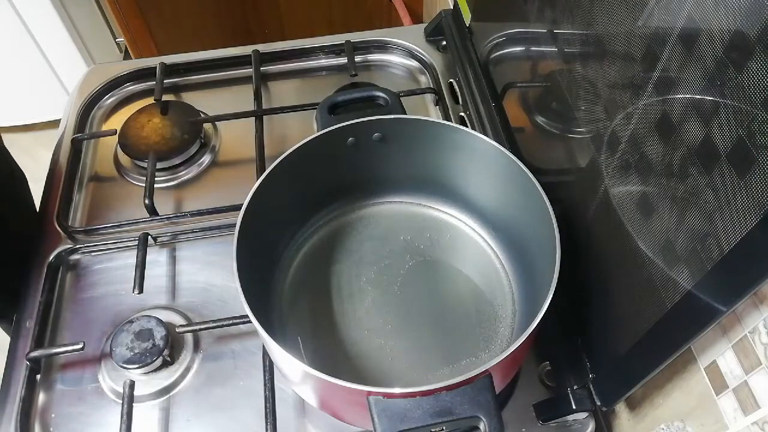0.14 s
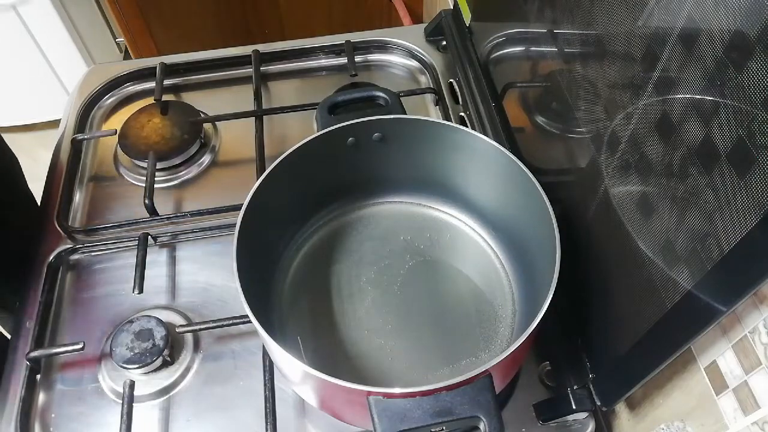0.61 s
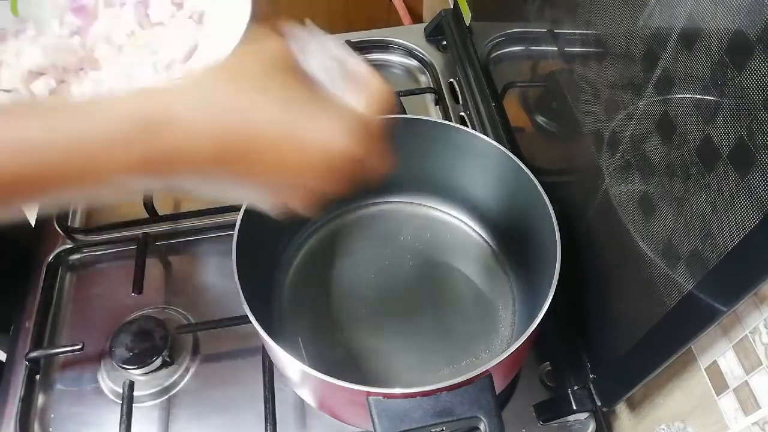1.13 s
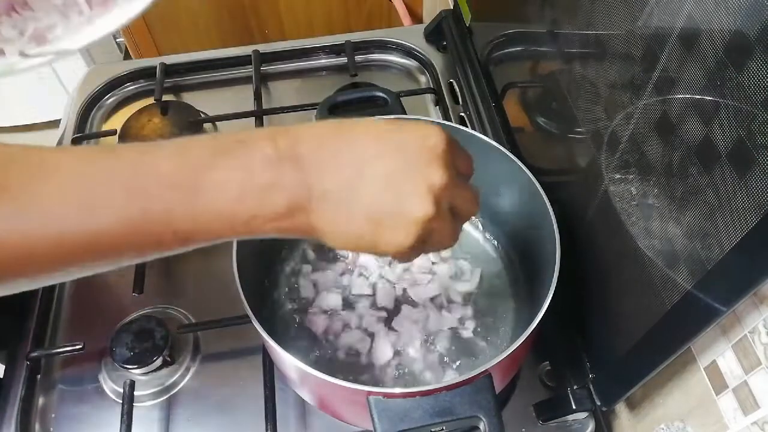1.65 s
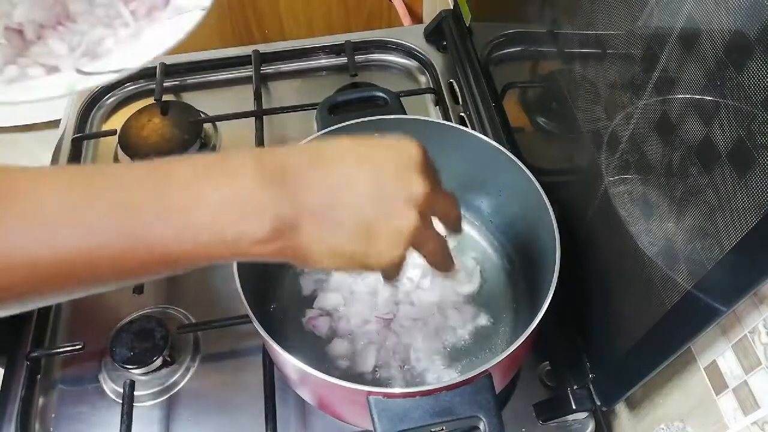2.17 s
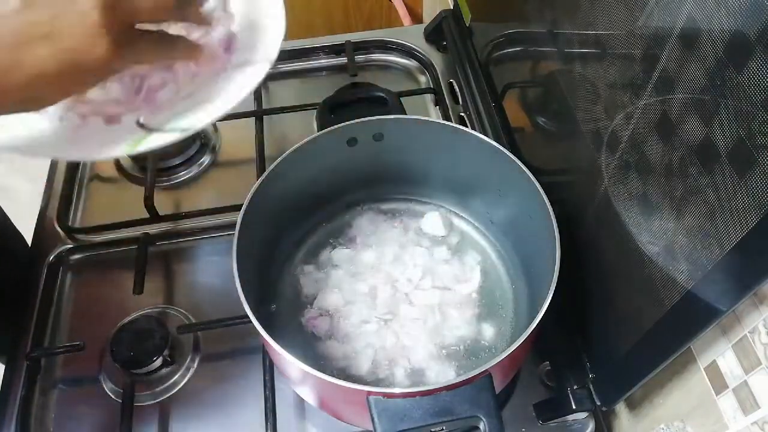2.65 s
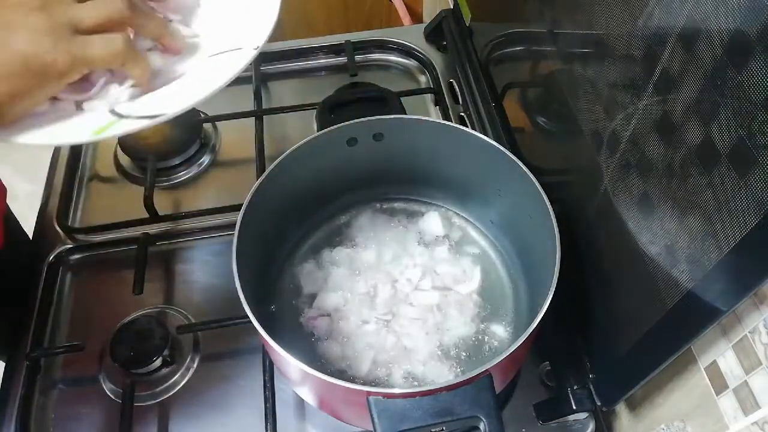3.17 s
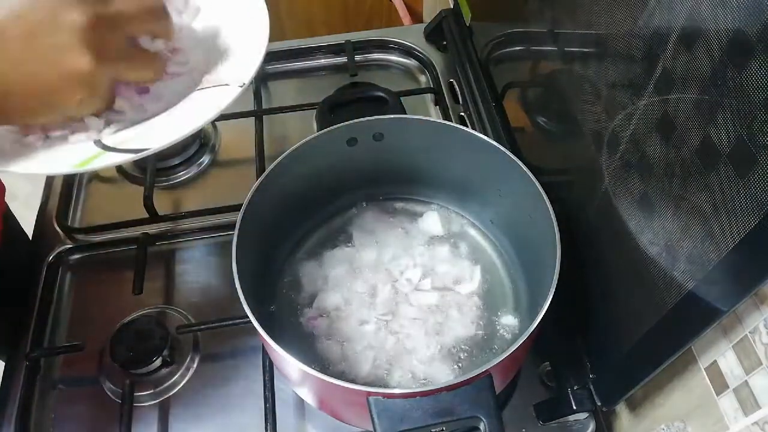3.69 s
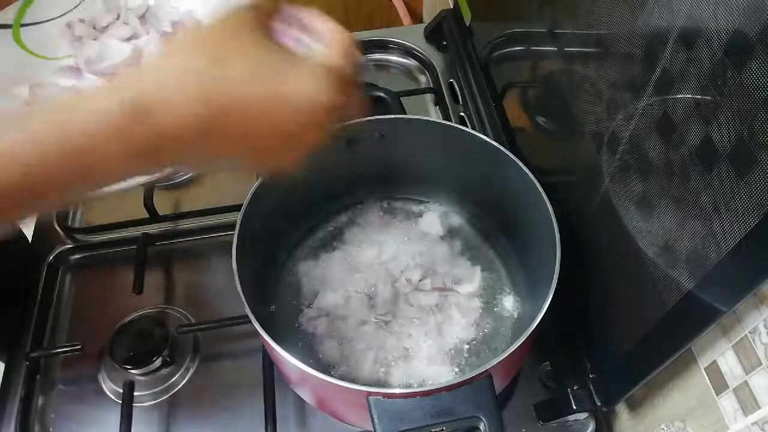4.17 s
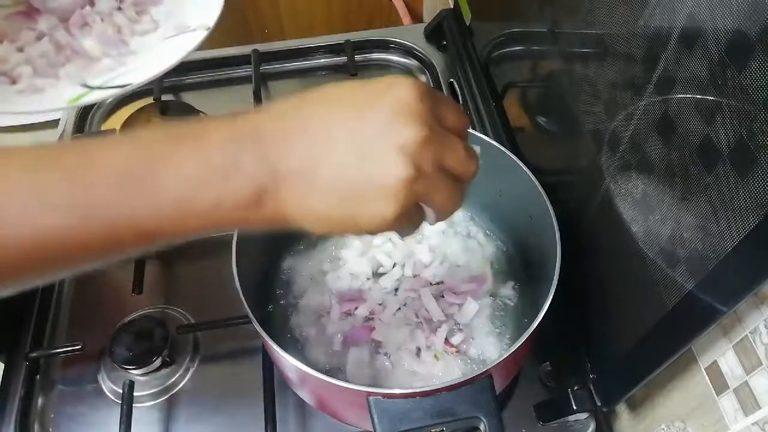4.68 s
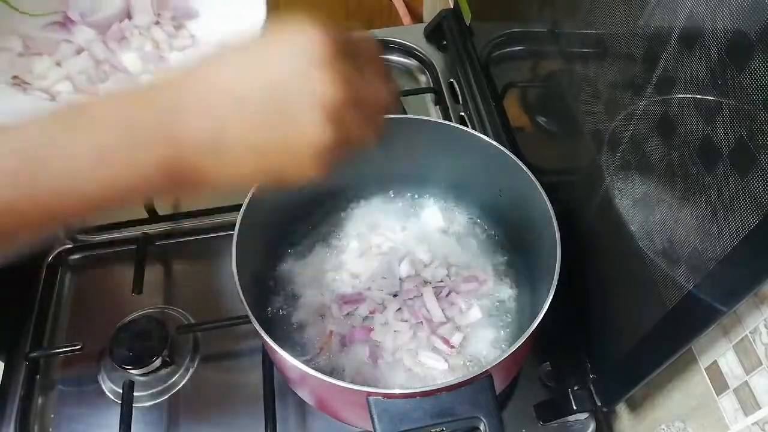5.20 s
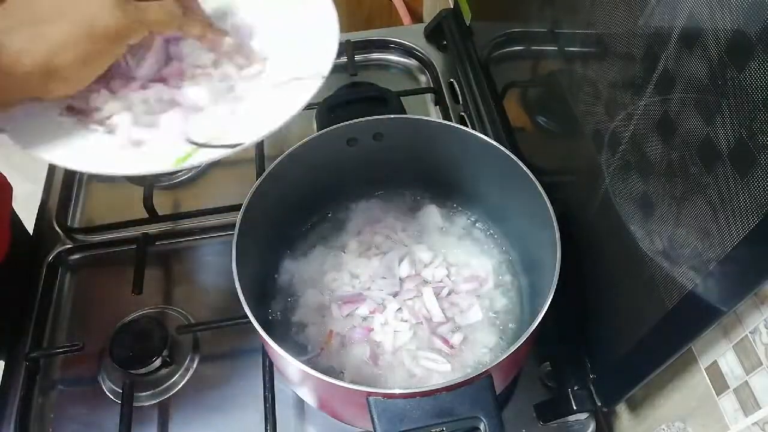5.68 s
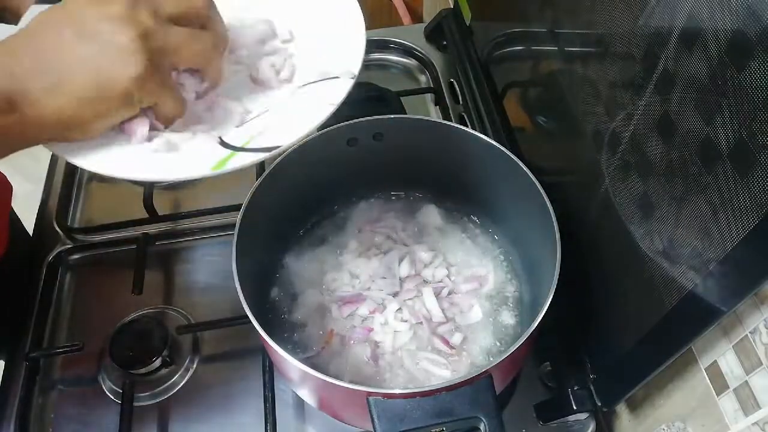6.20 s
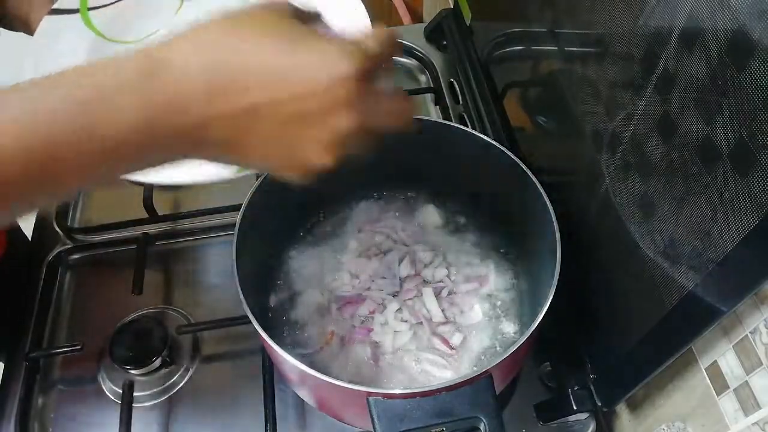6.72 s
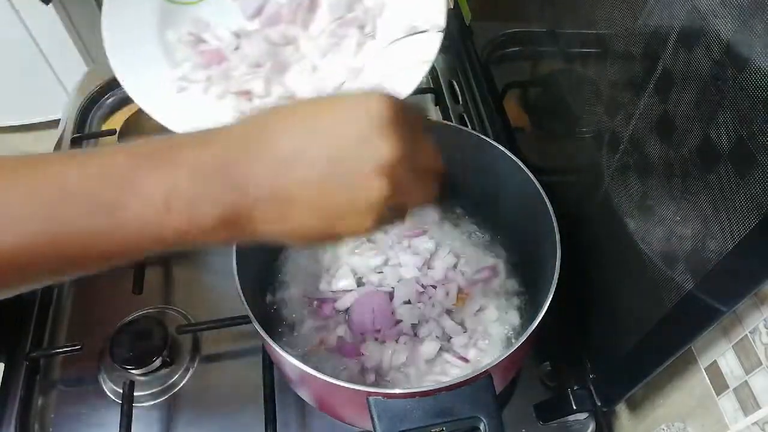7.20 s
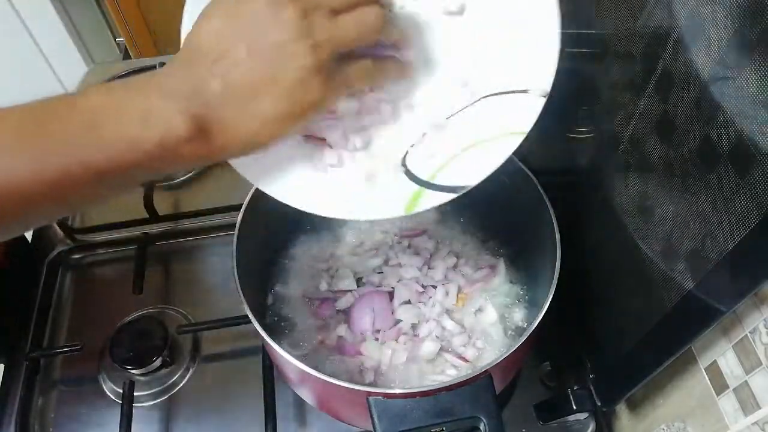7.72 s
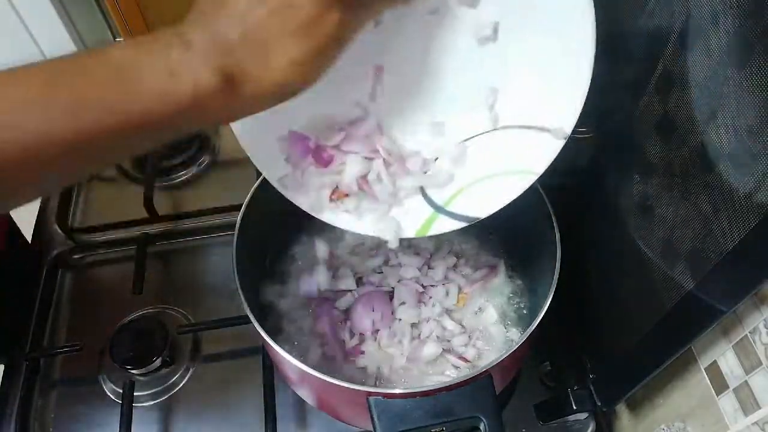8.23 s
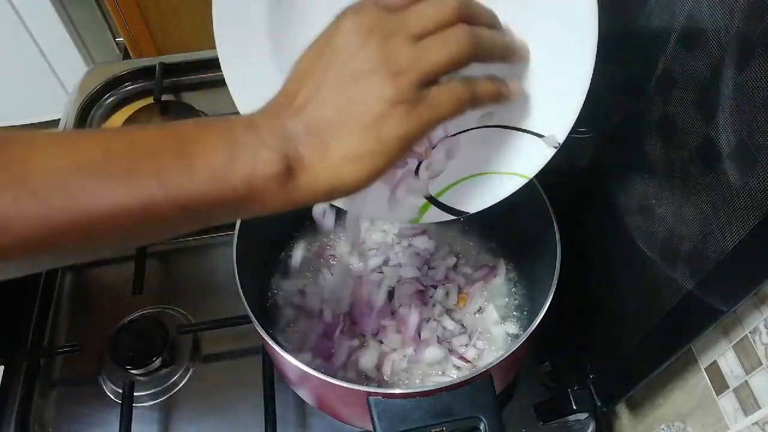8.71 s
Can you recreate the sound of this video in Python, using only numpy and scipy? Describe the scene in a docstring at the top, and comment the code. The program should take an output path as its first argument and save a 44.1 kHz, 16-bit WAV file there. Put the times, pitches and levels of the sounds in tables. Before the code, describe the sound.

A small kitchen, heard close to a deep metal pot in stereo. For the first 1.3 seconds it is nearly quiet: faint mains hum, low uneven rumble, room air, and a dry crinkling with tiny ticks, mainly around 0.2 to 0.4. At about 1.4 a handful of chopped onion thuds onto the bare base and the oil erupts in loud, bright sizzling, with sharp spits strongest near 1.9. By 2.1 it has fallen to a steady, gently fading fry with a hollow metallic resonance, crackles and bubbly pops. A second handful lands softly at 4.45, slightly lifting the sizzle. Pops cluster around 5.4 to 6.1, followed by a brief rising steam whistle at 6.1. Another muffled landing comes at 6.9, then very faint ones at 7.9 to 8.7, as the fry thins and softens until the end at about 8.9.

```python
"""A kitchen: handfuls of chopped onion drop into hot oil in a deep metal pot, close to a two-port microphone.
Thousands of short damped sines and patchy noise make the sizzle; larger bubbles seethe, pop and spit.
The pot rings along as a bank of resonances, the landings thud and splash, and a jet of steam whistles.
Behind lie mains hum, low rumble and room air; a faint dry rustle comes before the first handful."""
import sys
import numpy as np
from scipy import signal
from scipy.fft import rfft, irfft, next_fast_len
from scipy.io import wavfile
from scipy.ndimage import uniform_filter1d, map_coordinates

SR = 44100
rng = np.random.default_rng(int(sys.argv[2]) if len(sys.argv) > 2 else 0)


def persist_wave(psi):
    """Save psi, clipped to +-1, as 16-bit WAV."""
    counts = np.round(np.clip(psi, -1, 1) * 32767).astype(np.int16)
    wavfile.write(sys.argv[1], SR, np.atleast_2d(counts).T)


def invert_db(x):
    """Field ratio 10**(x/20) for x, a level in decibels (scalar or array-like)."""
    u = np.asarray(x, float) / 20
    return 10 ** u


N = 390726

# Sizzle of the frying, before its surges: (time [s], level [dB])
SIZZLE_LEVEL = [(1.35, -45), (1.36, -21.5), (1.375, -26), (1.39, -26.5), (1.45, -22.5), (1.66, -22),
                (1.72, -24.5), (1.96, -27.5), (2.07, -31.5), (2.5, -32), (3.2, -33.5), (3.75, -34.5),
                (4.25, -36), (4.53, -33.5), (5.6, -36), (6.95, -36.5), (8, -38.5), (8.86, -40)]
# Colour of the small bubbles: (frequency [Hz], relative density [dB per Hz])
SIZZLE_COLOUR = [(1500, -82), (3200, -15.5), (4200, -18), (4800, -9), (6300, -5), (7900, -3.5), (10700, -5),
                 (12500, -11.5), (15100, -24), (15900, -17.5)]
# Colour of the larger bubbles: (frequency [Hz], relative density [dB per Hz])
SEETHE_COLOUR = [(120, -15), (300, -7), (500, -0.5), (770, -5), (1500, -1.5), (2500, 3), (4000, 4.5),
                 (5500, 2.5), (7000, -8.5)]
# Stereo lean of the frying: (frequency [Hz], left over right [dB])
FRY_LEAN = [(400, -1.5), (900, -1.5), (1800, 1), (3000, 1.5), (6400, 3), (9800, -0.7), (15000, -2.8)]
# Resonances of the pot's air and walls: (centre [Hz], width [Hz], gain [dB])
POT_MODES = [(922, 25, -11), (1060, 28, -4), (1150, 76, -0.5), (1240, 77, -6), (1400, 72, -6),
             (1678, 37, -3), (1950, 57, -10), (2270, 73, -10.5), (2720, 68, -8)]
# Sharpest spits, note peak before filtering and reflections:
# (time [s], level [dB], pitch [Hz], left over right [dB])
SHARP_SPITS = [(1.3834, -10, 8900, 1.0), (1.5933, -9, 10200, 0.5), (1.761, -8.5, 7900, -5),
               (1.8418, -11, 7900, -4), (1.909, -2, 9660, -2), (1.9558, -7, 9100, -4),
               (2.0553, -15, 9400, -9), (2.0982, -13.5, 10900, -6), (2.2917, -9.5, 11000, -7),
               (2.5222, -16, 6900, -3), (2.7575, -21.5, 3900, 6), (3.1264, -15, 6670, -6),
               (3.4581, -13, 8400, 2), (3.6246, -14, 8200, 1.5), (3.6752, -9.5, 8640, 2.0),
               (5.478, -15.5, 9200, 4), (5.5938, -15, 7800, 2), (5.685, -14, 8050, 3),
               (5.923, -15, 7900, 9), (6.0597, -19, 4700, -2), (6.4365, -21, 4600, 2),
               (6.6758, -14, 7760, 10), (7.022, -20, 10700, 1.0), (7.167, -17, 8500, 4),
               (8.0262, -23, 5710, 2), (8.109, -16, 10700, 0.5), (8.2103, -14, 10700, -3),
               (8.411, -16, 10400, -8), (8.6024, -20, 7980, 9), (8.794, -14.5, 10300, -1.0)]
# Biggest bubbles bursting, note peak before filtering and reflections:
# (time [s], level [dB], pitch [Hz], left over right [dB])
BIG_POPS = [(1.389, -24.5, 1330, -3), (1.393, -27, 1950, -10), (1.658, -28, 1240, -2),
            (1.739, -21.5, 2680, 11), (1.81, -33, 1080, -2), (2.198, -31, 1080, -4),
            (2.246, -31.5, 1060, -2.5), (3.4201, -23, 2630, 1.0), (3.46, -30, 1180, -2),
            (3.554, -30, 2910, -1.0), (3.675, -32, 1330, 1), (3.878, -27, 2800, 0.5),
            (3.9399, -29.5, 3080, 0), (4.132, -22, 2160, -8), (4.141, -26, 2270, 2), (5.1128, -28, 2770, 4),
            (5.412, -27, 1760, -1.0), (5.458, -23, 1850, 4), (5.48, -20.5, 1340, -2),
            (5.994, -19.5, 1095, -3), (6.004, -21, 1950, 3), (6.059, -27, 1140, 2), (6.147, -28, 1180, 2),
            (6.436, -23.5, 2460, 2), (6.653, -34, 1400, -0.5), (6.831, -30.5, 1380, -4),
            (6.832, -31.5, 1870, 0.5), (6.96, -33, 910, -5), (6.972, -28.5, 1090, -0.5),
            (7.913, -35, 690, -1), (8.013, -37, 1400, -2), (8.112, -32.5, 1430, -3),
            (8.504, -39.5, 1060, -9), (8.607, -40, 1080, -1), (8.694, -35.5, 1080, -4)]
# Onion landing on the base, thud peak before panning: (time [s], level [dB], tumble decay [s])
ONION_LANDINGS = [(1.392, -22.5, 0.024), (1.472, -30.5, .046), (4.448, -33, 0.043), (4.493, -45, 0.026),
                  (6.923, -39, 0.034), (6.96, -35.5, 0.031), (7.912, -48, 0.016), (8.109, -43.5, 0.021),
                  (8.501, -47, 0.017), (8.604, -43.5, 0.036), (8.69, -49, 0.062)]
# Modes of the bare base, before a small random scatter in level: (frequency [Hz], level [dB], t60 [s])
BASE_MODES = [(371, 0, 0.2), (385, -14.5, 0.062), (439, -14.5, 0.31), (574, -12.5, 0.19), (910, -3, 0.078),
              (1038, -9, 0.19)]
# Colour of the oil thrown aside: (frequency [Hz], relative density [dB per Hz])
SPLASH_COLOUR = [(150, -49), (300, -4), (600, -0.5), (1200, -15), (2000, -8), (3500, -40)]
# Steam venting under a piece, before its pulsing: (time [s], pitch [Hz], level [dB])
STEAM_GLIDE = [(6.066, 980, -44), (6.087, 1150, -41.5), (6.115, 1320, -34), (6.145, 1410, -38)]
# Dry crinkles before the frying: (peak time [s], level [dB], fade [s])
DRY_CRINKLES = [(.17, -50, .01), (.21, -52, .02), (.25, -51, 0.026), (.3, -51, 0.044), (.39, -59, 0.058),
                (.66, -67, .02), (.93, -68, .015)]
# Colour of the crinkles: (frequency [Hz], relative density [dB per Hz])
CRINKLE_COLOUR = [(530, -46), (900, -9), (1230, -1), (2090, -18), (2720, -7), (4400, -10), (8930, -4.5),
                  (15900, -15)]
# Ticks among the crinkles, note peak before filtering and reflections:
# (time [s], level [dB], pitch [Hz], left over right [dB])
DRY_TICKS = [(.016, -49.5, 4510, 0), (.163, -40, 9000, .5), (.2995, -34, 8930, 1.5), (.9214, -48, 8000, 0),
             (0.931, -45.5, 3420, 2), (0.936, -46.5, 1350, 0), (1.196, -46, 7540, 1.5)]
# Rumble, before its random waver: (time [s], level [dB])
RUMBLE_LEVEL = [(0.0, -40.5), (0.15, -53), (0.32, -44.5), (0.47, -56.5), (2.14, -59), (2.24, -47),
                (2.32, -66), (2.44, -46), (2.49, -53), (2.81, -54), (3.06, -55), (3.18, -50.5),
                (4.39, -52.5), (4.76, -48), (5.18, -59.5), (8.86, -57)]
# Colour of the rumble: (frequency [Hz], relative density [dB per Hz])
RUMBLE_COLOUR = [(15, -49), (25, -19), (59, -6), (75, -4.5), (97, -11), (105, -21), (140, -32), (230, -120)]
# Colour of the room air: (frequency [Hz], relative density [dB per Hz])
AIR_COLOUR = [(59, -54), (100, -9), (129, -9), (166, -5.5), (244, -9), (308, -12.5), (460, -14),
              (546, -23.5), (816, -20.5), (889, -18.5), (1710, -22.5), (5060, -38.5), (10400, -40),
              (15900, -52)]
# Likeness of the room air at the two ports: (frequency [Hz], left-right correlation [-1 to 1])
AIR_LIKENESS = [(60, 0.63), (240, 0.99), (950, -0.52), (3770, 0.15), (15000, -0.16)]

STEADY_DB = -35  # sizzle of the settled fry, the reference for what follows it
SPAN_S = .0006  # full spread of left-right arrival differences across the pot
MIC_HZ = 14400  # corner of the microphone's top
TOP_HZ = 15900  # band limit


def unit(x):
    """Scales to rms 1."""
    return x / np.sqrt(np.mean(x ** 2) + 1e-20)


def along(points, hz):
    """Reads a table against frequency on a log axis."""
    f, v = np.transpose(points)
    return np.interp(np.log(hz + 1), np.log(f + 1), v)


def curves(rows):
    """Draws one value per sample for each column after the time."""
    s, *cols = np.transpose(rows)
    return [np.interp(np.arange(N) / SR, s, c) for c in cols]


def wobble(rate):
    """A smooth random curve with rate knots a second."""
    knots = rng.standard_normal(int(N * rate / SR) + 4)
    return map_coordinates(knots, [np.arange(N) * rate / SR])


def filtered(x, response):
    """Multiplies the spectrum by a complex response of frequency."""
    m = next_fast_len(N + 8192)
    return irfft(rfft(x, m) * response(np.fft.rfftfreq(m, 1 / SR)), m)[..., :N]


def coloured(x, spectrum):
    """Replaces the average spectrum of a sound by the given one, at rms 1."""
    own_hz, own_power = signal.welch(x, SR, nperseg=256)
    own_power = np.atleast_2d(own_power).mean(0)

    def response(hz):
        return invert_db(along(spectrum, hz)) / np.sqrt(np.interp(hz, own_hz, own_power) + 1e-12)
    return unit(filtered(x, response))


def sides(db):
    """Left and right gains for a left-over-right level."""
    return invert_db(np.array([db, -np.asarray(db)]) * .5)


def hiss(patchy_db):
    """Unrelated noise on the two ports, with patches of random gain shared in time and frequency."""
    z = signal.stft(rng.standard_normal((2, N)), nperseg=256)[2]
    field = uniform_filter1d(rng.standard_normal(z.shape[1:]), 8, 0)
    field = unit(uniform_filter1d(field, 8, 1))
    return unit(signal.istft(z * invert_db(patchy_db * field), nperseg=256)[1][:, :N])


def scattered(x, direct_db, t60):
    """Each port hears the direct sound, then quick reflections off walls and hob, redrawn every 0.1 s."""
    hop = SR // 10
    count, t = N // hop + 1, np.arange(hop) / SR
    tail = rng.standard_normal((2, count, hop)) * invert_db(-60 * t / t60)
    tail = tail / np.linalg.norm(tail, axis=2, keepdims=True) / invert_db(direct_db)
    echo = tail + (t == 0)  # the direct sound is a single sample of 1
    blocks = np.pad(x, ((0, 0), (0, count * hop - N))).reshape(2, count, hop)
    wet = irfft(rfft(blocks, 2 * hop) * rfft(echo, 2 * hop), 2 * hop)
    early = wet[..., :hop].reshape(2, -1)
    late = np.pad(wet[..., hop:].reshape(2, -1), ((0, 0), (hop, 0)))
    return early[:, :N] + late[:, :N]


def pot(hz):
    """The pot's air and walls as a sum of band-pass resonances."""
    return sum(invert_db(db) * 1j * hz * w / (c * c - hz * hz + 1j * hz * w) for c, w, db in POT_MODES)


def bubbles(s, size, hz, cycles, rise, lag, width):
    """Damped sines whose pitch rises as each bubble opens.

    size: (ports, bubbles) peaks; lag: left port behind right [s]; width: length [samples]."""
    k = np.arange(width)
    turns = hz[:, None] * k / SR
    u = turns / cycles[:, None]
    wave = np.sin(2 * np.pi * turns * (1 + rise * u / 2))
    wave = wave * np.exp(-3 * u) * (1 - np.exp(-2 * turns))
    wave = wave / abs(wave).max(1, keepdims=True)
    ports = []
    for side, gain in zip((1, -1), size):
        # 10 ms of lead keeps every index positive and is cut off again
        at = np.round((s + .01 + side * lag / 2) * SR).astype(int)[:, None] + k
        ports.append(np.bincount(at.ravel(), (gain[:, None] * wave).ravel(), N + SR)[SR // 100:][:N])
    return np.array(ports)


def swarm(count, low_hz, high_hz, cycles, scatter_db, width):
    """Bubbles at random times, pitches and places, their levels scattered exponentially in dB."""
    when, pitch, big, where = rng.random((count, 4)).T
    hz = low_hz * (high_hz / low_hz) ** pitch
    size = invert_db(-scatter_db * np.log(1 - .995 * big)) * sides(8 * (where - .5))
    return bubbles(when * N / SR, size, hz, np.full(count, cycles), 0.095, (where - .5) * SPAN_S, width)


def frying():
    """Fine and coarse bubble swarms over a hiss of countless smaller ones; the coarse ones ring the pot."""
    sizzle_db, = curves(SIZZLE_LEVEL)
    over_db = sizzle_db - STEADY_DB
    since = np.arange(N) / SR - SIZZLE_LEVEL[0][0]
    late_db = -16 * np.exp(-abs(since) / 0.16)  # the ring starts weaker and builds up
    ring_db = -46.5 + 0.7 * over_db + late_db + 1.56 * wobble(4.04) + 1.2 * wobble(14)
    seethe_db = -40 + 0.76 * over_db + 0.51 * wobble(4.9)
    surge_db = 0.34 * wobble(25) + 0.3 * wobble(90)

    fine = swarm(count=22000, low_hz=3360, high_hz=13900, cycles=4.3, scatter_db=-0.5, width=96)
    fine = unit(scattered(fine, direct_db=-2.8, t60=0.076))
    coarse = swarm(count=8000, low_hz=586, high_hz=5160, cycles=3.8, scatter_db=2.5, width=400)
    crackle = swarm(count=2500, low_hz=3300, high_hz=11000, cycles=1.24, scatter_db=1.3, width=64)
    crackle = unit(scattered(crackle, direct_db=0.53, t60=0.02))

    flat = [(500, 0)]
    sizzle = coloured(fine + .6 * crackle + .8 * hiss(patchy_db=1.6), SIZZLE_COLOUR)
    seethe = unit(scattered(coarse, direct_db=-10, t60=0.079))
    seethe = seethe + 0.41 * coloured(crackle, flat) + 2.0 * hiss(patchy_db=-0.7)
    seethe = coloured(seethe, SEETHE_COLOUR)
    # a drive shared by both ports keeps much of the ring alike on the two
    drive = coloured(coarse.mean(0), flat) + 0.94 * rng.standard_normal(N) + 0.6 * hiss(patchy_db=0.0)
    ring = unit(filtered(drive, lambda hz: pot(hz) * pot(hz) ** .35))

    mix = invert_db(sizzle_db) * sizzle + invert_db(seethe_db) * seethe + invert_db(ring_db) * ring
    return filtered((since > 0) * invert_db(surge_db) * mix, lambda hz: sides(along(FRY_LEAN, hz)))


def bursts(rows, cycles, span_s, rise, crack_db, low_hz, ring_db, direct_db, t60):
    """Single bubbles that stand out: a wide crack as the film tears, the bubble's note, a knock on the pot."""
    s, db, hz, pan = np.transpose(rows)
    where, life = rng.random((len(s), 2)).T
    lag = (where - .5) * span_s
    size = invert_db(db) * sides(pan)
    note_cycles = np.clip(cycles * (.8 + .4 * life), 1, 30)
    note = bubbles(s, size, hz, note_cycles, rise, lag, width=1500)
    crack = bubbles(s, size, 1.5 * hz, 1.2 + 0 * s, .6, lag, width=200)

    def band(f):
        # a small bubble radiates little bass; the microphone rounds off the top
        return (1j * f / (low_hz + 1j * f)) ** 3 / (1 + 1j * f / MIC_HZ) ** 2
    own = filtered(note + invert_db(crack_db) * crack, band)
    knock = invert_db(ring_db) * filtered(own, pot)
    return scattered(own + knock, direct_db, t60)


def lesser(count, follows, over_db, spread_db, low_hz, high_hz):
    """Rows of smaller bursts at random moments, louder as the sizzle grows (follows: dB per dB)."""
    when, big, pitch, where = rng.random((count, 4)).T
    first, last = SIZZLE_LEVEL[0][0], SIZZLE_LEVEL[-1][0]
    s = first + when * (last - first)
    sizzle_db = np.interp(s, *np.transpose(SIZZLE_LEVEL))
    db = STEADY_DB + follows * (sizzle_db - STEADY_DB) + over_db + spread_db * (big - .5)
    return list(zip(s, db, low_hz * (high_hz / low_hz) ** pitch, 10 * (where - .5)))


def spits():
    """Sharp high bursts, mostly crack, with little bass and a short scatter of reflections."""
    more = lesser(count=60, follows=0.93, over_db=9.5, spread_db=2, low_hz=3450, high_hz=11000)
    return bursts(SHARP_SPITS + more, cycles=7.4, span_s=SPAN_S / 3, rise=0.13, crack_db=8.5,
                  low_hz=1490, ring_db=-7.5, direct_db=1.5, t60=0.023)


def pops():
    """Big bubbles bursting, mostly note, with longer reflections."""
    more = lesser(count=40, follows=1.0, over_db=-6.5, spread_db=14, low_hz=1014, high_hz=5430)
    return bursts(BIG_POPS + more, cycles=6.3, span_s=SPAN_S / 6, rise=0.052, crack_db=-2.0,
                  low_hz=314, ring_db=-7.5, direct_db=-3.5, t60=0.12)


def landings():
    """Onion tumbles onto the base in soft blows and a splash; the growing pile damps the base's ring."""
    buried_s = 3.5  # the base's freedom to ring falls to 1/e in this time
    splash_db, bare_db, pan_db = -0.5, -10, -1.5  # splash over thud, its change on bare metal, left over right
    size = SR // 3
    t = np.arange(size) / SR
    splash = coloured(rng.standard_normal((2, N)), SPLASH_COLOUR)
    splash = np.pad(splash, ((0, 0), (0, SR)))
    out = np.zeros((2, N + SR))
    for s, db, length in ONION_LANDINGS:
        start = round(s * SR)
        free = np.exp(-(s - ONION_LANDINGS[0][0]) / buried_s)
        ring = np.zeros(size)
        for hz, level, t60 in BASE_MODES:
            fall_db = 60 * t / (t60 * max(free, .05))
            ring += invert_db(level + rng.normal(0, 0.43) - fall_db) * np.sin(2 * np.pi * hz * t)
        tumble = np.exp(-t / max(length, .002))
        pieces = invert_db(3.3 * wobble(96)[:size])  # the handful arrives in lumps
        blows = pieces * (rng.standard_normal(size) + .5 * rng.standard_normal((2, size)))
        blows[:, 0] += 1.1 * free ** 2 * np.sqrt(length * SR)  # the first piece strikes hardest on bare metal
        soft_ring = ring * (1 - np.exp(-t / .002))
        thud = signal.fftconvolve(soft_ring[None], blows * tumble, axes=1)[:, :size]
        thud = thud / abs(thud).max()
        wet = splash[:, start:start + size] * pieces * tumble * (1 - np.exp(-t / 0.0013))
        landing = thud + invert_db(splash_db + bare_db * free) * wet
        out[:, start:start + size] += invert_db(db) * sides(pan_db)[:, None] * landing
    return out[:, :N]


def whistle():
    """A jet of steam of rising, unsteady pitch, pulsing as its vent opens and shuts."""
    hz, db = curves(STEAM_GLIDE)
    t = np.arange(N) / SR
    on = (t > STEAM_GLIDE[0][0]) & (t < STEAM_GLIDE[-1][0])
    pulse = 1 + .7 * np.sin(2 * np.pi * 95 * t + 1.5 * wobble(40))
    vent = pulse * invert_db(3 * wobble(120))
    tone = np.sin(2 * np.pi * np.cumsum(hz * (1 + .06 * wobble(250))) / SR)
    return scattered(np.tile(on * invert_db(db) * vent * tone, (2, 1)), direct_db=-1.6, t60=0.067)


def rustle():
    """Something dry crinkles and ticks nearby: swells of gritty noise and short damped notes."""
    t = np.arange(N) / SR
    rise_s = 0.016
    level = np.zeros(N)
    for s, db, fade in DRY_CRINKLES:
        level += invert_db(db) * np.exp(np.minimum((t - s) / rise_s, (s - t) / fade))
    grit = coloured(invert_db(1.3 * wobble(70)) * hiss(patchy_db=1.0), CRINKLE_COLOUR)
    ticks = bursts(DRY_TICKS, cycles=4, span_s=SPAN_S, rise=.1, crack_db=0.0,
                   low_hz=500, ring_db=-20.5, direct_db=-5.5, t60=0.075)
    return level * grit + ticks


def kitchen():
    """Wavering mains hum, low rumble nearly alike on both ports, and room air of set likeness."""
    hum_hz = 120.1
    phase = hum_hz * np.arange(N) / SR + .04 * wobble(5)
    hum = np.sqrt(2) * np.sin(2 * np.pi * phase)
    hum_db = -53 - wobble(3.914)

    rumble_db, = curves(RUMBLE_LEVEL)
    rumble_db = rumble_db + 0.98 * wobble(6)
    rumble = coloured(rng.standard_normal(N) + 0.16 * rng.standard_normal((2, N)), RUMBLE_COLOUR)

    def mid_side(hz):
        # this angle between mid and side gives the wanted correlation
        turn = np.arccos(np.clip(along(AIR_LIKENESS, hz), -1, 1)) / 2
        return np.array([np.cos(turn), np.sin(turn)])
    mid, side = filtered(coloured(hiss(patchy_db=-0.7), AIR_COLOUR), mid_side)
    air = np.array([mid + side, mid - side])
    return invert_db(hum_db) * hum + invert_db(rumble_db) * rumble + invert_db(-52.5) * air


def scene():
    """Everything at the microphone."""
    return frying() + spits() + pops() + landings() + whistle() + rustle() + kitchen()


def top_cut(x):
    """Nothing passes above the cut-off."""
    return signal.sosfilt(signal.butter(12, 16660, fs=SR, output="sos"), x)


def record(dry):
    """The preamplifier rounds off the hardest spits, then a band limit cuts the top."""
    soft = dry / (1 + abs(dry / .7) ** 4) ** (1 / 4)
    mix = filtered(soft, lambda hz: hz < TOP_HZ)
    return top_cut(mix)


dry = scene()
out = record(dry)
persist_wave(out)
```